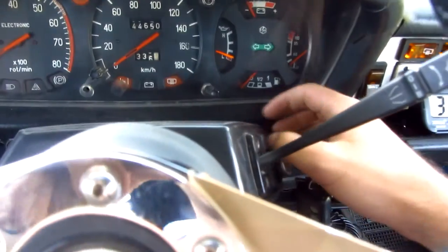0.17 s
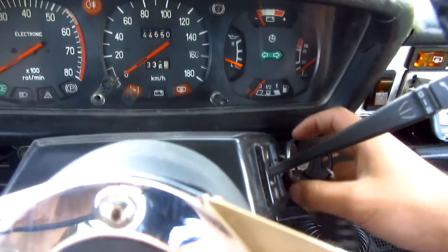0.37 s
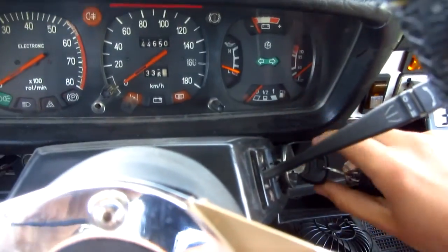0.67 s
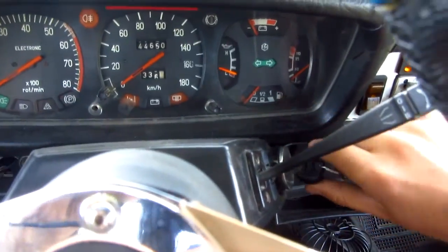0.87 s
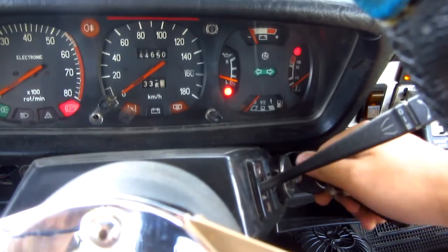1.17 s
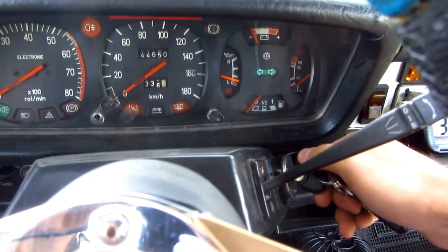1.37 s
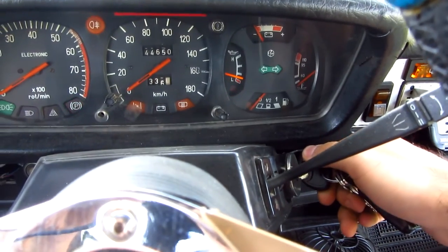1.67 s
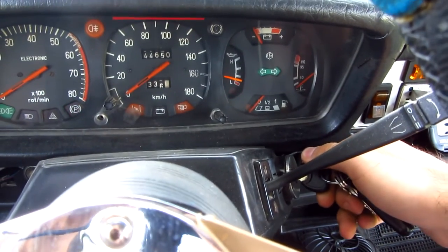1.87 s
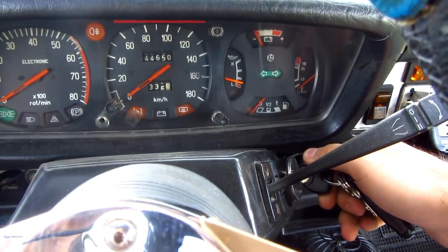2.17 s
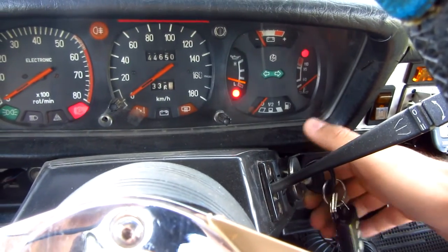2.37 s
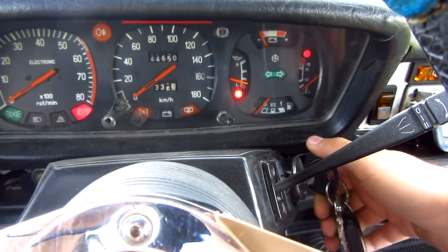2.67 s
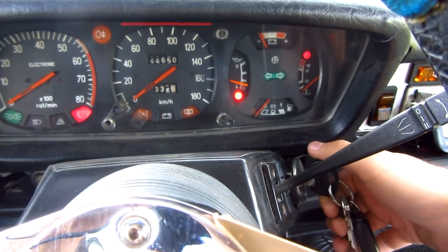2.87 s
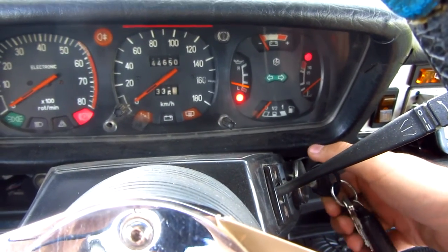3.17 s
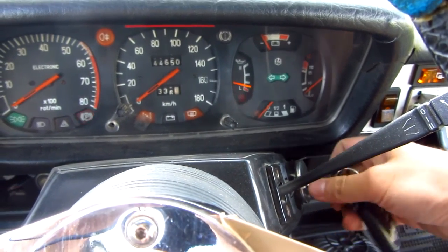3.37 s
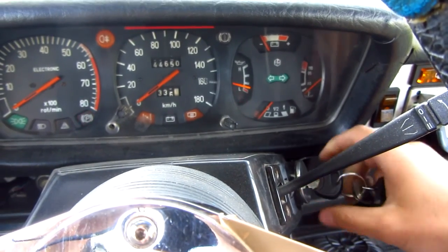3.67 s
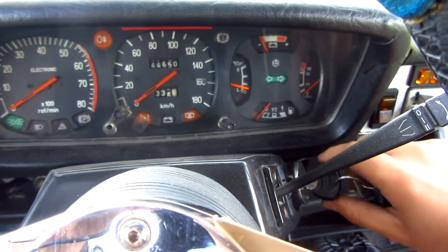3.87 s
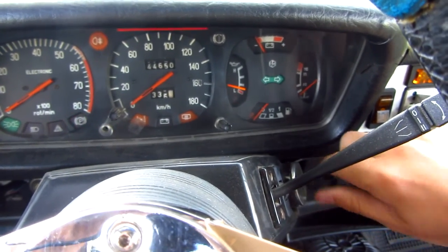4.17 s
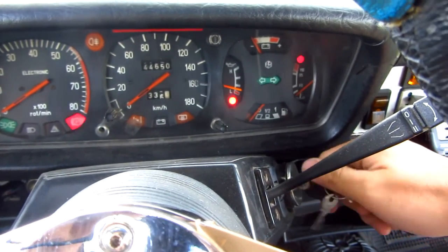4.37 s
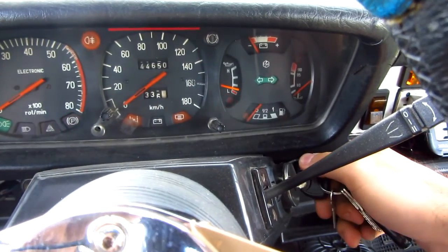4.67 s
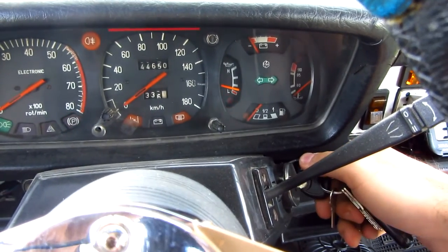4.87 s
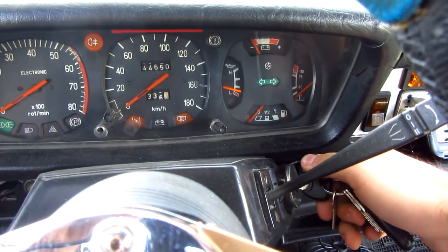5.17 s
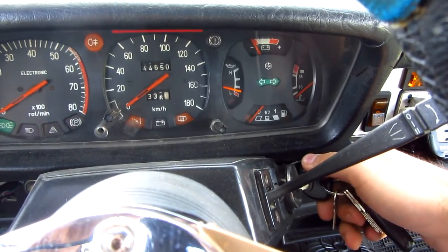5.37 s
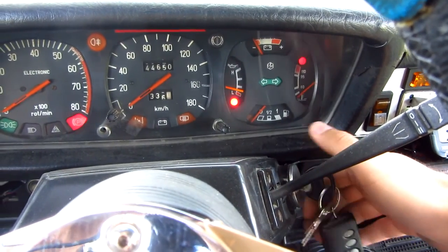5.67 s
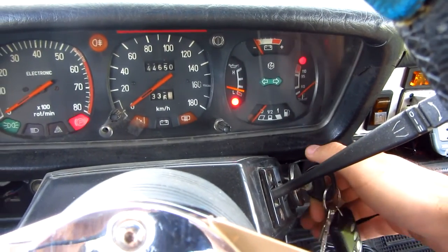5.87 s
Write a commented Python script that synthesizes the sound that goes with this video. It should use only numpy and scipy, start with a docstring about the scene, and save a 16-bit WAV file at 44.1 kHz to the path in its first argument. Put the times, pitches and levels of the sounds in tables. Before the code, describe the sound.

A key scrapes and snaps in an old car's steering lock, the fob clacks, and two start attempts clunk, grind briefly and stall.

```python
"""A key is pushed into the steering lock of a parked old car and turned twice to start, with a flat battery.
The lock scrapes (dense tiny slips) and snaps (noise burst plus steel modes); fob and key ring knock and jingle (modes).
The starter throws in its pinion, jolts and stalls: grinding noise, ringing housing, falling gear whine.
Each time the key springs back the solenoid drops out and the cabin booms (low air modes).
A faint outdoor rumble and the brushing of a sleeve (coloured noise) lie underneath."""
import sys
import numpy as np
from scipy import signal
from scipy.fft import rfft, irfft, next_fast_len
from scipy.io import wavfile
from scipy.ndimage import uniform_filter1d

SR = 44100
rng = np.random.default_rng(int(sys.argv[2]) if len(sys.argv) > 2 else 0)


def log_audio(samples):
    """Write samples as a 16-bit WAV file to the path given in sys.argv[1]."""
    # one column per channel
    frames = np.atleast_2d(samples).T
    # limit to full scale, then quantise
    limited = np.clip(frames, -1, 1)
    pcm = np.round(limited * 32767).astype(np.int16)
    wavfile.write(sys.argv[1], SR, pcm)


N = 266275
T = np.arange(next_fast_len(int(.69 * SR), real=True)) / SR  # time axis of one blow, s

# fob modes: nominal f/Hz, level/dB, nominal t60/s
FOB_MODES = [(1197, -10, 0.027), (1458, -7.5, 0.024), (1528, -11, 0.1), (1950, -8.5, 0.045),
             (2216, -8.5, 0.063), (2487, -3, 0.059), (2682, -11.5, 0.063), (2944, -4.5, 0.019),
             (3750, -9, 0.022), (3940, -19, 0.028)]
# spectrum of a dull tap: f/Hz, level/dB
TAP_COLOUR = [(60, -14), (1000, -12), (1550, 3.5), (2500, 0.5), (3300, 3), (4200, -24), (8000, -3),
              (16000, -42)]
# spectrum of a metallic edge: f/Hz, level/dB
EDGE_COLOUR = [(100, -19), (1500, -12), (3500, 6), (5800, 9), (8000, -2.5), (11500, -2), (14500, 2.5),
               (16000, -14)]
# spectrum of gritty friction: f/Hz, level/dB
GRIT_COLOUR = [(150, 1), (400, 3.5), (700, 11.5), (1100, 1), (1700, 1), (2500, -0.5), (4000, -9),
               (6500, -9), (9000, -13.5), (12000, -23), (15000, -25)]

ROCK_HZ = 173.3  # jolt of the engine on its mounts


def amp(db):
    """Decibels to gain."""
    return 10 ** (np.asarray(db) / 20)


def fade(t60):
    """Exponential decay of one blow; t60 is at least 3 ms."""
    return np.exp(-np.log(1000) * T / max(t60, .003))


def swell(rise_s):
    """A soft push builds up instead of starting at once."""
    return 1 - np.exp(-T / rise_s)


def unit(x):
    """Scale a blow so that its loudest 3 ms have rms 1."""
    power = uniform_filter1d(np.mean(x ** 2, axis=0), size=132)
    return x / np.sqrt(power.max())


def add(out, s, x):
    """Mix x into out from time s."""
    i = max(int(s * SR), 0)
    out[:, i:i + x.shape[1]] += x[:, :N - i]


def waver(rate, size=N):
    """Random steps, smoothed twice, with a spread of 1."""
    k = int(SR / rate)
    steps = np.repeat(rng.standard_normal(size // k + 1), k)
    x = uniform_filter1d(uniform_filter1d(steps, k), k)[:size]
    return x / x.std()


def curve_db(table, f):
    """Read a table of f/Hz, level/dB on a logarithmic frequency axis."""
    hz, db = np.array(table).T
    return np.interp(np.log(f), np.log(hz), db)


def noise(colour, size, tilt_db=0, width=None):
    """Coloured stereo noise of rms 1; its side-to-mid ratio varies with frequency."""
    # width of near contacts: f/Hz, side over mid/dB
    near_width = [(100, -9), (600, -10), (2000, -3), (4000, -3), (7000, 2), (14000, 0.5)]
    f = np.fft.rfftfreq(size, 1 / SR) + 1
    shape_db = curve_db(colour, f)
    side_gain = amp(curve_db(near_width if width is None else width, f))
    # tilt in dB per octave about 2 kHz, level below 500 Hz
    tilt = tilt_db * np.log2(np.maximum(f, 500) / 2000)
    gain = amp(shape_db + tilt) * f / (f + 20)
    mid, side = rfft(rng.standard_normal((2, size)))
    both = mid + side_gain * side * np.array([[1], [-1]])
    x = irfft(gain * both / np.hypot(1, side_gain), size)
    return x / x.std()


def burst(colour, t60, crack=0., rise_s=0.00044, tilt_db=0):
    """A contact and its dense reflections off dashboard and windscreen."""
    decay = fade(t60) + crack * fade(0.0099)
    return unit(noise(colour, len(T), tilt_db) * decay * swell(rise_s))


def ring(modes, pitch=1, length=1, scatter=0.02):
    """Damped modes; the phase between the two sides tends to differ more the higher the mode."""
    wide_hz = 3350
    out = 0
    for k, (multiple, db, t60) in enumerate(modes):
        hz = multiple * pitch * (1 + scatter * rng.standard_normal())
        skew = min(0.46 + hz / wide_hz / 2, 1.3) * rng.uniform(0.16, 0.91) * np.array([[1], [-1]])
        wave = np.sin(2 * np.pi * hz * T + skew)
        out = out + (-1) ** k * amp(db) * fade(t60 * length) * wave
    return out


def favour(modes, hz, boost_db, octaves):
    """Where a thing is struck decides which of its modes speak loudest."""
    return [(f, db + boost_db * np.exp(-(np.log2(f / hz) / octaves) ** 2), t60) for f, db, t60 in modes]


def lock():
    """Each snap of the lock also knocks the column, shakes the fob and stirs the cabin air."""
    # snaps: t/s, level/dB, tilt/(dB/octave), column knock/dB, favoured column f/Hz, fob rattle/dB, boom/dB
    snaps = [(1.056, -15, -0.5, -16, 620, -21.5, -36), (1.26, -15.5, 1.5, -27, 750, -34, -45),
             (4.2747, -15, 0.5, -16.5, 565, -21, -29), (4.4963, -12.5, 1, -21, 724, -41, -37)]
    # dull knocks of hand and barrel through the column: t/s, level/dB, favoured f/Hz, grit/dB, thump/dB
    knocks = [(0.094, -44.5, 703, -62, -58), (0.217, -43.5, 684, -50, -58), (0.434, -33.5, 660, -62, -52),
              (0.549, -32.5, 577, -34.5, -52), (0.798, -39, 590, -56, -53), (1.025, -28.5, 624, -33.5, -44),
              (1.176, -28, 630, -25, -30.5), (2.575, -48, 570, -62, -64), (3.305, -36, 564, -38, -52),
              (3.356, -24, 690, -22.5, -55), (3.367, -16, 700, -34, -30), (4.136, -45, 590, -46.5, -48.5),
              (4.236, -28.5, 566, -26, -31.5), (4.4045, -33, 700, -23.5, -35), (4.412, -19, 627, -26, -26),
              (4.436, -28.5, 600, -53, -33)]
    thump_hz = 207
    out = np.zeros((2, N))
    for s, db, tilt_db, knock_db, hz, fob_db, boom_db in snaps:
        shroud = column(hz, rise_s=0.00035) * fade(0.17)
        fob = unit(ring(FOB_MODES))
        add(out, s, amp(db) * snap(tilt_db) + amp(knock_db) * shroud + amp(fob_db) * fob)
        add(out, s, amp(boom_db) * boom(hz=158, t60=.48))
    for s, db, hz, grit_db, thump_db in knocks:
        add(out, s, knock(db, hz, grit_db) + amp(thump_db) * jolt(thump_hz))
    return out


def snap(tilt_db=0, ring_db=-3):
    """A sprung detent snaps steel on steel; its short ring shifts with the grip."""
    # lock modes: nominal f/Hz, level/dB, t60/s before the length factor
    lock_modes = [(3500, 4, 0.026), (4080, -12, 0.092), (4580, -12.5, 0.1), (6185, 4.5, 0.08),
                  (6480, -5, 0.11), (6710, 8, 0.014), (8040, -33, .04), (7900, -2, 0.038), (8440, 3, 0.069),
                  (9970, 3, 0.041)]
    # spectrum of the snap: f/Hz, level/dB
    snap_colour = [(40, -16), (300, 3.5), (1000, 7.5), (1600, -0.5), (3300, 1), (5000, -1), (6300, 2.5),
                   (8500, -4), (11500, -8.5), (16000, -20)]
    grip = 1 + 0.019 * rng.standard_normal()
    steel = unit(ring(lock_modes, pitch=grip, length=0.56, scatter=0.013))
    strike = burst(snap_colour, t60=0.062, crack=0.56, tilt_db=tilt_db)
    return unit(strike + amp(ring_db) * steel)


def knock(db, hz, grit_db):
    """The barrel knocks softly on its stop, with a little grit."""
    grit = burst(GRIT_COLOUR, t60=0.09, rise_s=0.00092)
    return amp(db) * column(hz, rise_s=0.0012) + amp(grit_db) * grit


def column(hz, rise_s, left_db=3.5):
    """The plastic shroud of the steering column gives a hollow knock."""
    # column modes: nominal f/Hz, level/dB before the boost, t60/s
    column_modes = [(534.5, -4.5, 0.13), (593.4, -0.5, 0.063), (676, 0, 0.069), (805, 3.5, 0.031),
                    (953, 0, 0.051), (1000, -26, .05), (1170, -37, 0.18)]
    body = ring(favour(column_modes, hz, boost_db=18.0, octaves=0.33), scatter=0.024)
    balance = amp(np.array([[left_db], [-left_db]]) / 2)
    return unit(body * swell(rise_s) * balance)


def boom(hz, t60):
    """The cabin air booms after a hard blow."""
    # cabin air modes: nominal f/Hz, level/dB before the boost, share of the t60
    cabin_modes = [(96.1, -2, 1), (115.6, -19, .9), (144.55, 1.5, 0.77), (168, -0.5, 1), (196, -9.5, 1),
                   (239.2, 5, 0.34), (287.4, 13.5, 0.27), (325, 0, 0.45)]
    air = ring(favour(cabin_modes, hz, boost_db=8.5, octaves=0.1), length=t60, scatter=0.0064)
    return unit(air * swell(rise_s=0.033))


def jolt(hz, rumble_db=-9):
    """Rubber mounts pass only a few soft cycles; the car body rumbles after them."""
    # spectrum of the body rumble: f/Hz, level/dB
    jolt_colour = [(25, -28), (60, -2.5), (110, -4), (260, -2.5), (400, -14), (800, -22.5), (2000, -75)]
    thud = unit(ring([(hz, 0, .024)]) * swell(rise_s=0.011) ** 3)
    return thud + amp(rumble_db) * burst(jolt_colour, t60=0.36, rise_s=0.0034)


def releases(stop_s=.004, boom_s=0.00999):
    """The key snaps back onto its stop; the solenoid drops out, jolts the engine and booms the cabin."""
    # releases: t/s, snap/dB, column knock/dB, jolt/dB, boom/dB, favoured boom f/Hz
    drop_outs = [(2.374, -22, -22.5, -24, -28, 145), (3.3767, -19.5, -18, -25.5, -26.5, 168),
                 (5.633, -29.5, -22.5, -18.5, -23.5, 147)]
    release_hz, grit_re_knock_db = 630, -2
    drop_out_s = .015
    rebound_s, rebound_re_jolt_db, rebound_hz = 0.092, -11.5, 142  # the engine rocks back once
    out = np.zeros((2, N))
    for s, snap_db, knock_db, jolt_db, boom_db, boom_hz in drop_outs:
        add(out, s, amp(snap_db) * snap())
        add(out, s + stop_s, knock(knock_db, release_hz, knock_db + grit_re_knock_db))
        add(out, s + boom_s, amp(boom_db) * boom(boom_hz, t60=0.62))
        add(out, s + drop_out_s, amp(jolt_db) * jolt(ROCK_HZ))
        add(out, s + drop_out_s + rebound_s, amp(jolt_db + rebound_re_jolt_db) * jolt(rebound_hz))
    return out


def keys(snap_hz=2700):
    """The plastic fob clacks; the thin keys tick, ring very high and bounce once."""
    # fob and key head tap the lock: t/s, clack/dB, favoured ring f/Hz, metallic edge/dB, dry clack re ring/dB
    taps = [(0.5108, -33.5, 2840, -40, -8), (0.5609, -17.5, 2870, -21.5, -3),
            (0.9176, -43.5, 3000, -46.5, 7), (1.189, -18.5, 2400, -32, -7), (1.1989, -17.5, 2300, -40, -3),
            (1.2297, -23, 2310, -33, -13), (1.515, -45, 2800, -64, -12), (1.658, -52, 2670, -66, -3),
            (2.4088, -16.5, 1380, -25, 4.5), (2.491, -37.5, 1620, -46, -6), (2.512, -49, 1520, -47.5, -7),
            (2.829, -48, 1510, -60, -27), (3.2868, -39.5, 1520, -38, -21), (3.34, -43, 2600, -32, -3),
            (3.3629, -19, 1490, -26, -8), (3.4313, -24.5, 2770, -35, -7), (3.481, -35.5, 1530, -38, -2),
            (3.536, -34.5, 2800, -63, -12), (3.5695, -33.5, 2920, -44, 0), (3.674, -47, 1550, -45.5, 0),
            (3.799, -45.5, 2950, -41.5, -3), (4.225, -44, 2240, -42, -6), (5.6662, -34, 1530, -40, -11),
            (5.6954, -21.5, 2810, -20, -6), (5.7397, -31, 2600, -25.5, -1.5)]
    # keys swing together on their ring: t/s, level/dB, ring f/Hz
    jingles = [(0.5433, -37.5, 14900), (1.13, -42, 13100), (2.361, -37.5, 13200), (2.396, -24.5, 14700),
               (2.7438, -44.5, 13200), (3.352, -30, 15000), (3.48, -38, 12700), (4.403, -36, 13200),
               (4.439, -34, 13100), (5.6064, -38, 13800), (5.666, -35, 13900), (5.685, -28, 13900),
               (5.738, -27, 14400)]
    # blade modes: multiple of the ring f, level/dB, t60/s before the length factor
    blade_modes = [(.93, -16, 0.028), (.985, -7, 0.032), (1, 8, 0.064), (1.02, -10, 0.026), (1.06, -6, .03)]
    # spectrum of a key tick: f/Hz, level/dB
    key_colour = [(2000, 0), (6000, -5), (10500, 4.5), (12000, 3.5), (14000, 8.5), (16000, -17)]
    bounce_s, bounce_db, blade_re_tick_db = 0.017, -15, -1.5
    out = np.zeros((2, N))
    for s, db, hz, edge_db, dry_db in taps:
        fob = favour(FOB_MODES, hz, boost_db=15.5, octaves=0.2)
        body = unit(ring(fob, scatter=0.0048) * fade(0.34))
        contact = unit(ring([(snap_hz, 0, .003)]))  # very short, ahead of ring and reflections
        dry_clack = burst(TAP_COLOUR, t60=0.053, crack=1.) + contact
        clack = unit(body + amp(dry_db) * dry_clack)
        edge = burst(EDGE_COLOUR, t60=0.056, crack=1.0)
        add(out, s, amp(db) * clack + amp(edge_db) * edge)
    for s, db, hz in jingles:
        for k in range(2):
            blade = unit(ring(blade_modes, hz, length=0.55, scatter=0.02) * swell(rise_s=0.0012))
            tick = burst(key_colour, t60=0.026, rise_s=0.0033)
            add(out, s + k * bounce_s, amp(db + k * bounce_db) * (tick + amp(blade_re_tick_db) * blade))
    return out


def scraping(rate=1100, scatter_db=3.5, catch_rate=170, catch_db=3):
    """Pins and wards catch on the blade in fits: dense tiny slips, each gritty, each ringing the key head."""
    # strokes in the barrel, levels before hand pressure:
    # start t/s, end t/s, rub/dB, tilt/(dB/octave), key head chatter/dB
    strokes = [(0.385, 0.432, -46, 2.5, -56), (0.537, 0.56, -44, 7, -45), (0.587, 0.748, -60, 5.5, -55),
               (1.138, 1.212, -34, 2.5, -41.5), (1.221, 1.253, -33, 3, -30.5), (1.289, 1.318, -46, 2, -48),
               (2.331, 2.376, -41, 1.5, -50), (2.374, 2.421, -37, 1.5, -48), (3.297, 3.326, -42.5, -3, -65),
               (3.338, 3.398, -26.5, 3, -39), (3.409, 3.448, -30.5, 2.5, -39), (3.459, 3.6, -51, 1, -59),
               (3.61, 3.667, -50, 3.5, -44.5), (4.24, 4.271, -39, -6, -51), (4.342, 4.368, -46, 3.5, -71),
               (4.394, 4.463, -35, 3, -41), (4.487, 4.497, -33.5, 3.5, -46), (4.847, 4.896, -63, 5, -57),
               (5.59, 5.646, -40.5, 3.5, -54), (5.629, 5.7, -32.5, 2.5, -39)]
    out = np.zeros((2, N))
    for start, end, db, tilt_db, chatter_db in strokes:
        chance = rng.random((len(T), 2)).T
        fits = amp(catch_db * waver(catch_rate, size=len(T)))
        strength = amp(scatter_db * np.minimum(-np.log(chance[1]), 3))
        slips = ((chance[0] < rate / SR) + .002) * fits * strength
        power = signal.fftconvolve(slips ** 2, fade(.009) * swell(rise_s=.0004))[:len(T)]
        grip = np.sqrt(np.abs(power) / power.mean())
        grit = grip * noise(GRIT_COLOUR, len(T), tilt_db)
        head = ring(favour(FOB_MODES, 2754, boost_db=15, octaves=0.14), length=0.4, scatter=0.021)
        chatter = signal.fftconvolve(slips[None], head, axes=1)[:, :len(T)]
        rub = amp(db) * grit + amp(chatter_db) * chatter / chatter.std()
        add(out, start, pressure(max(end - start, .005)) * rub)
    return out


def pressure(length):
    """Force of the hand over one stroke: a quick rise, a slow creep upward, then let go."""
    press_db, press_share = 3, 0.23  # rise over the first part of the stroke
    creep_db, let_go_db_per_s = 2, 1098
    rise = press_db * np.minimum(T / (press_share * length) - 1, 0)
    creep = creep_db * (T / length - .5)
    return amp(rise + creep - let_go_db_per_s * np.maximum(T - length, 0))


THROW_S = .0585  # the pinion flies this long, then hits the flywheel


def starter(boom_db=-41, count=4):
    """The pinion flies out grinding and hits the flywheel; the motor stalls, the engine rocks, the cabin booms."""
    # tries of the starter: t/s, clank/dB, housing ring f/Hz, strongest jolt/dB
    tries = [(1.344, -39, 782, -22), (4.556, -32.5, 909, -19)]
    grind_db, grind_t60_s = -30.5, 0.16
    hit_db, hit_grit_db, hit_edge_db, flywheel_hz = -26.5, -28.5, -29.5, 711.4
    pull_in_re_jolt_db, pull_in_hz = -8, 122  # the solenoid pulls in
    twist_s, twist_re_jolt_db, twist_hz = .024, -5, 229  # the motor twists in its bracket as it takes current
    rock_delay_s, rock_period_s, rock_fall_db = .038, .04, 3.5  # the engine rocks, weaker each time
    out = np.zeros((2, N))
    for s, db, hz, jolt_db in tries:
        grind = burst(GRIT_COLOUR, grind_t60_s, rise_s=0.006)
        add(out, s, amp(db) * clank(hz) + amp(grind_db) * grind + whine())
        crack = amp(hit_grit_db) * burst(GRIT_COLOUR, t60=0.082)
        crack += amp(hit_edge_db) * burst(EDGE_COLOUR, t60=0.013)
        hit = amp(hit_db) * clank(flywheel_hz) + crack
        add(out, s + THROW_S, hit + amp(boom_db) * boom(hz=146, t60=0.99))
        add(out, s, amp(jolt_db + pull_in_re_jolt_db) * jolt(pull_in_hz))
        add(out, s + twist_s, amp(jolt_db + twist_re_jolt_db) * jolt(twist_hz))
        for k in range(count):
            rock = amp(jolt_db - k * rock_fall_db) * jolt(ROCK_HZ)
            add(out, s + rock_delay_s + k * rock_period_s, rock)
    return out


def clank(hz):
    """The starter housing rings behind the bulkhead."""
    # housing modes: multiple of the ring f, level/dB, t60/s before the length factor
    starter_modes = [(.77, -2.5, 0.41), (1, 8.5, 0.23), (1.14, -1, 0.11), (1.5, 8, 0.045)]
    return unit(ring(starter_modes, hz, length=0.73) * swell(rise_s=0.0019))


def whine(flutter=0.0424, rough_db=4):
    """Gear teeth mesh unevenly and ever more slowly, loudest after the throw and after the hit."""
    start_hz, slowing_s, stall_s = 900, .29, 0.187  # starting pitch, time constant of its fall, length
    steady_db, kick_db, kick_t60_s = -51, -24.5, 0.1
    mesh_hz = start_hz * np.exp(-T / slowing_s) * (1 + flutter * waver(241, size=len(T)))
    kick = swell(rise_s=0.0058) ** 2 * fade(kick_t60_s)
    hit_kick = np.interp(T - THROW_S, T, kick)
    load = amp(steady_db) + amp(kick_db) * (kick + hit_kick)
    stall = np.clip((stall_s - T) / 0.011, 0, 1)
    gain = load * amp(rough_db * waver(214, size=len(T))) * stall
    phase = 2 * np.pi * np.cumsum(mesh_hz) / SR
    return gain * swell(rise_s=0.002) * np.sin(phase + np.array([[.2], [-.2]]))


def background(rumble_waver_db=0.74, cloth_waver_db=2.1):
    """Outdoor rumble and hiss; a sleeve brushes unevenly and fingers touch the column as the hand moves."""
    # outdoor spectrum: f/Hz, level/dB
    outside_colour = [(15, -39), (25, -20), (76, 0.5), (149, 1.5), (180, 0.5), (217, -1.5), (503, -10.5),
                      (624, -10.5), (1040, -15), (1480, -19.5), (2280, -22), (3820, -29), (8360, -26),
                      (10700, -38), (16000, -30)]
    # sleeve moves: middle t/s, half length to 1/e/s, level/dB
    sleeve = [(.15, 0.77, -49.5), (1.135, 0.1, -50.5), (4.314, 0.5, -52.5), (6.0, 0.88, -57.5)]
    # spectrum of the cloth: f/Hz, level/dB
    sleeve_colour = [(100, 6.5), (400, 10.5), (700, 10), (1200, 0.5), (2500, 0), (3800, -4.5), (7500, -4),
                     (11000, -11.5), (16000, -18)]
    # width of the air: f/Hz, side over mid/dB
    air_width = [(30, -9), (120, 7.5), (600, 3.5), (2000, -2), (6000, -1), (14000, 0.5)]
    outside_db = -47
    touches_per_s, touch_hz = 9, 656
    touch_re_sleeve_db, tick_re_sleeve_db = -2, -5
    t = np.arange(N) / SR
    motion = sum(amp(db) * np.exp(-((t - s) / half) ** 2) for s, half, db in sleeve)
    size = next_fast_len(N)
    rumble_gain = amp(outside_db + rumble_waver_db * waver(42))
    out = rumble_gain * noise(outside_colour, size, width=air_width)[:, :N]
    cloth_gain = motion * amp(cloth_waver_db * waver(60))
    out += cloth_gain * noise(sleeve_colour, size, width=air_width)[:, :N]
    touch = amp(touch_re_sleeve_db) * column(touch_hz, rise_s=0.0069)
    touch = touch + amp(tick_re_sleeve_db) * burst(TAP_COLOUR, t60=0.044)
    # one touch at a random moment of each slot
    for k, (when, force) in enumerate(rng.random((int(touches_per_s * N / SR), 2))):
        s = (k + when) / touches_per_s
        add(out, s, (.5 + force) * np.interp(s, t, motion) * touch)
    return out


def scene():
    """Everything as heard from the driver's seat."""
    return lock() + releases() + keys() + scraping() + starter() + background()


def record(dry):
    """A steep elliptic low-pass cuts the top."""
    top_hz = 16100
    return signal.sosfilt(signal.ellip(8, .2, 80, top_hz, fs=SR, output="sos"), dry)


dry = scene()
out = record(dry)
log_audio(out)
```